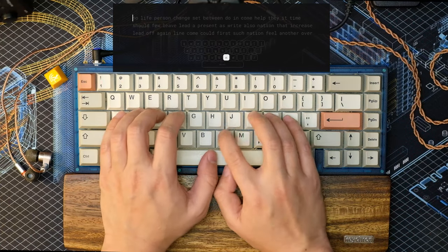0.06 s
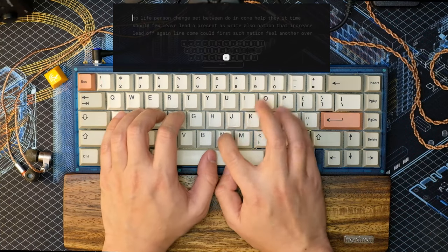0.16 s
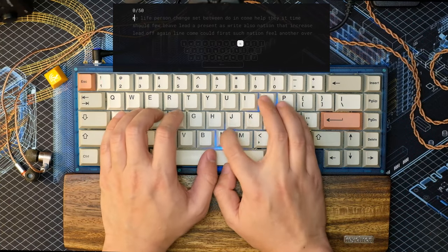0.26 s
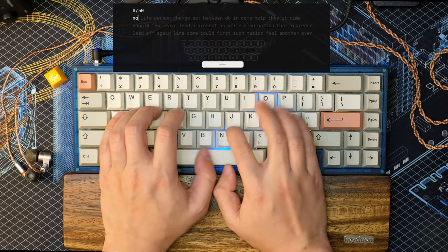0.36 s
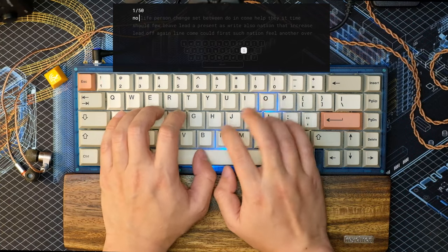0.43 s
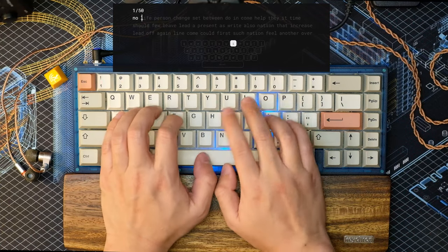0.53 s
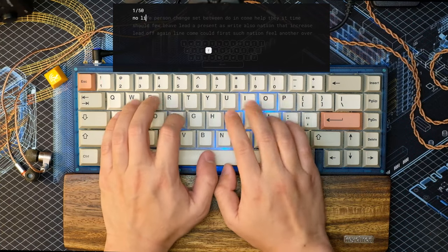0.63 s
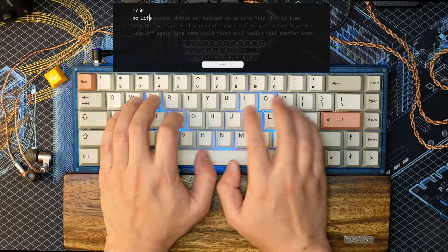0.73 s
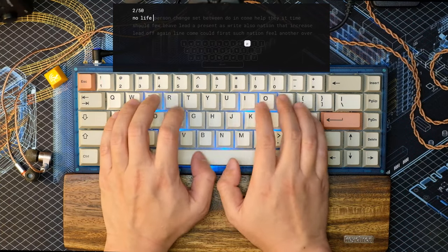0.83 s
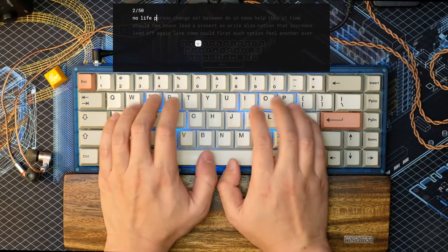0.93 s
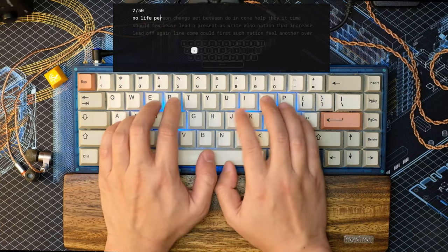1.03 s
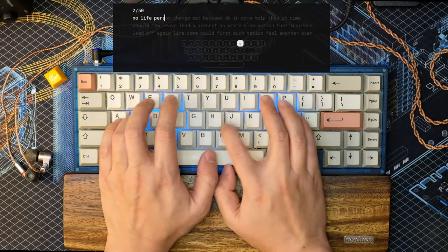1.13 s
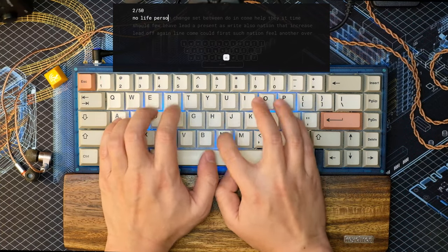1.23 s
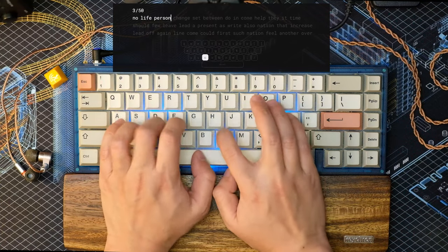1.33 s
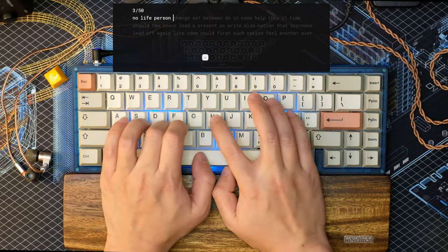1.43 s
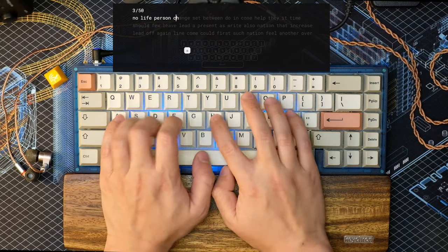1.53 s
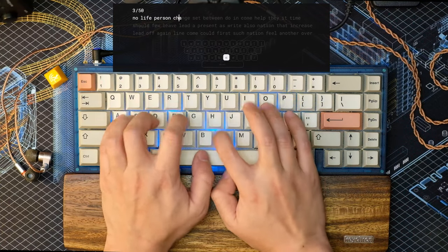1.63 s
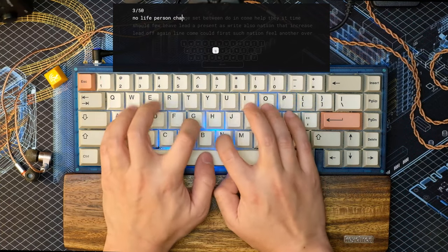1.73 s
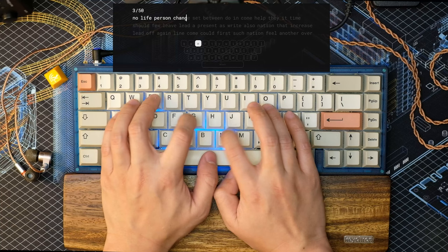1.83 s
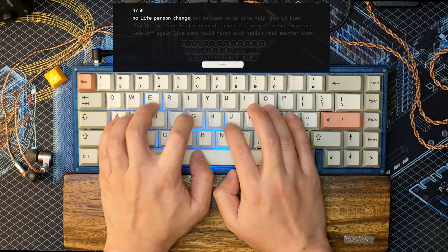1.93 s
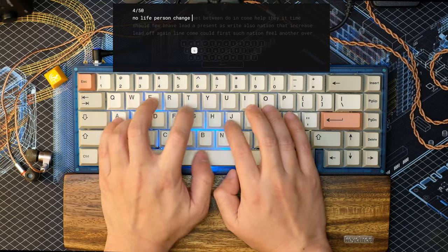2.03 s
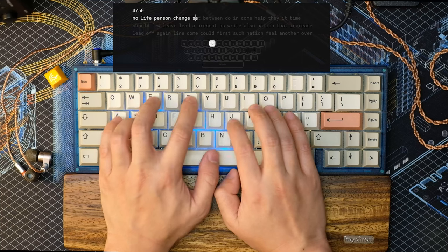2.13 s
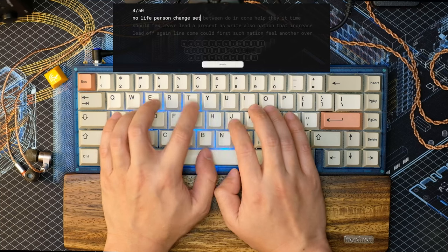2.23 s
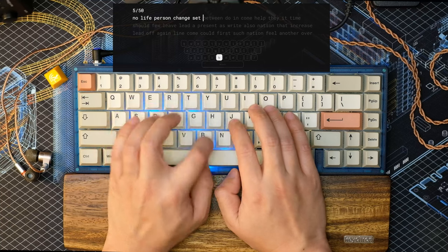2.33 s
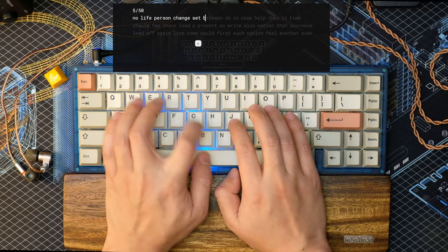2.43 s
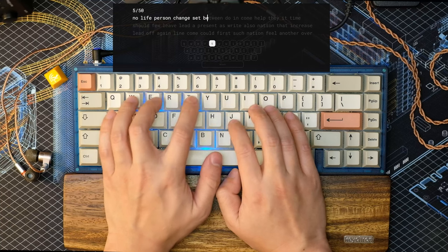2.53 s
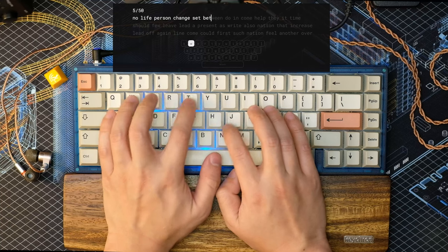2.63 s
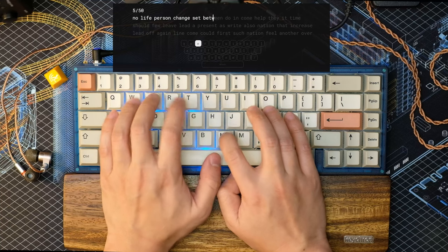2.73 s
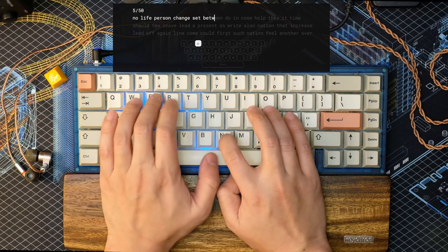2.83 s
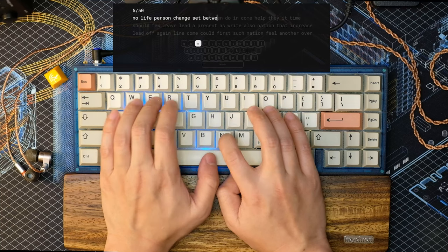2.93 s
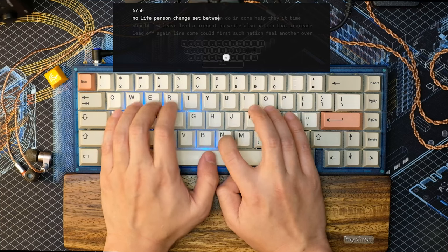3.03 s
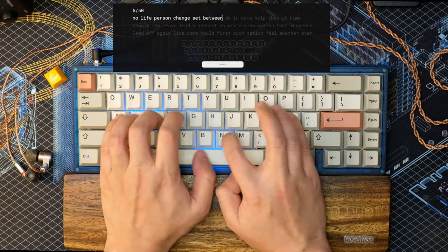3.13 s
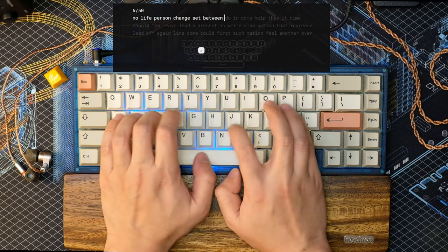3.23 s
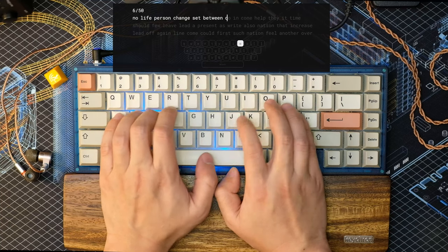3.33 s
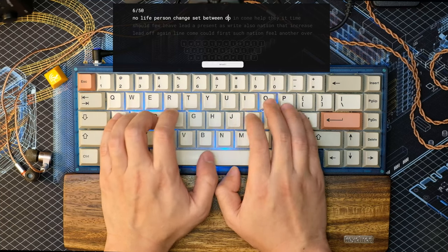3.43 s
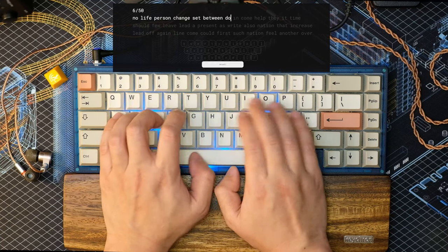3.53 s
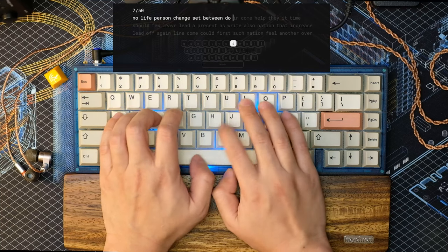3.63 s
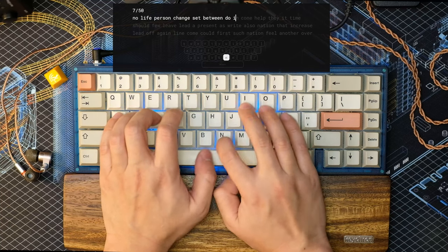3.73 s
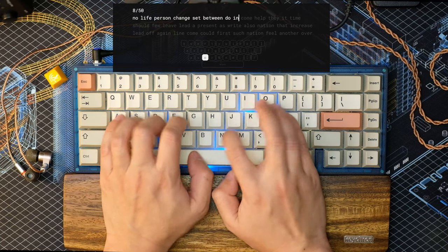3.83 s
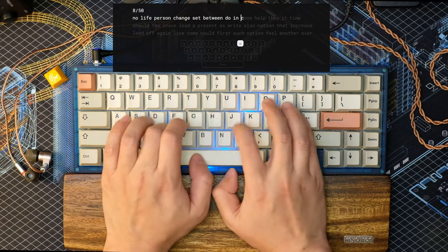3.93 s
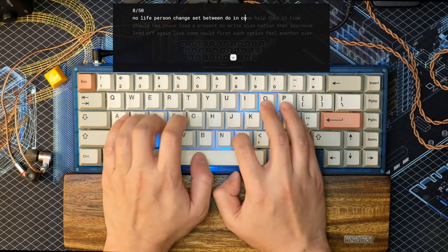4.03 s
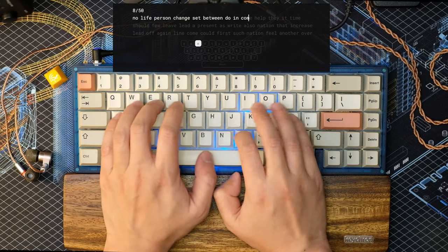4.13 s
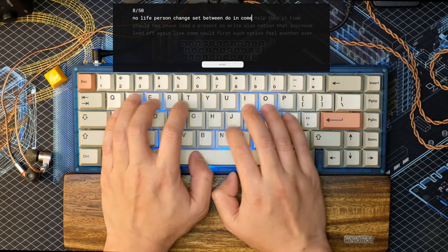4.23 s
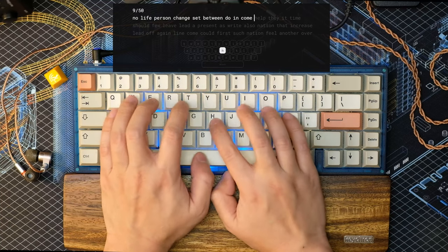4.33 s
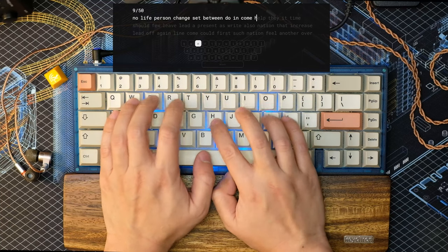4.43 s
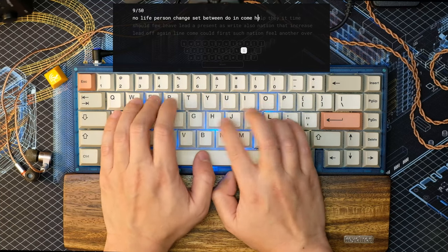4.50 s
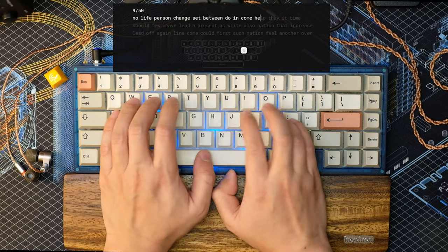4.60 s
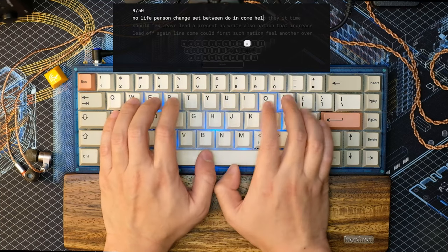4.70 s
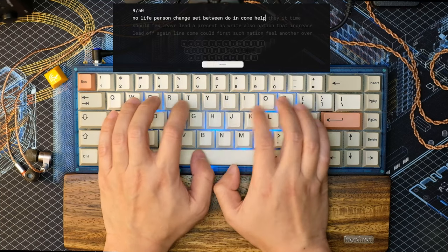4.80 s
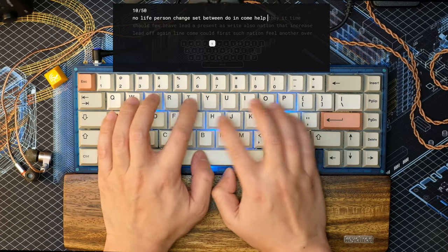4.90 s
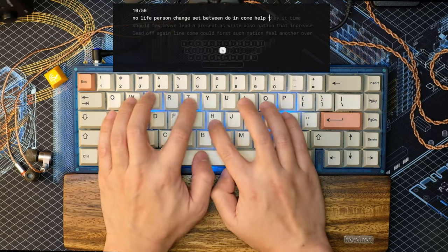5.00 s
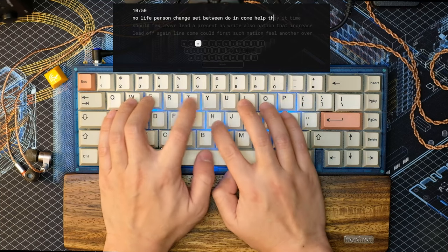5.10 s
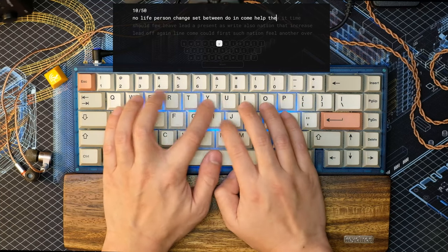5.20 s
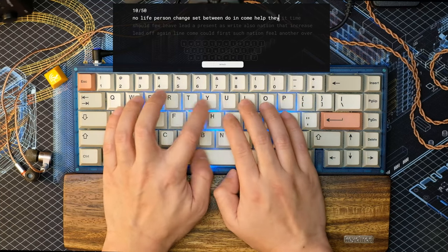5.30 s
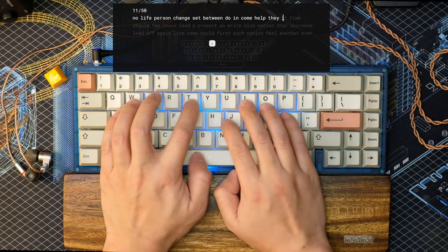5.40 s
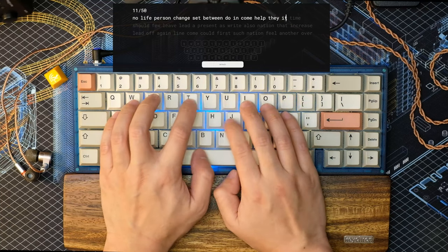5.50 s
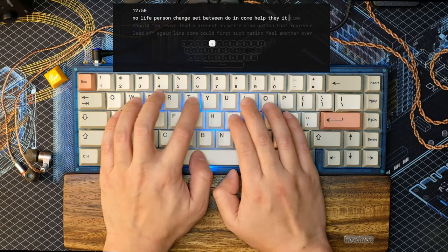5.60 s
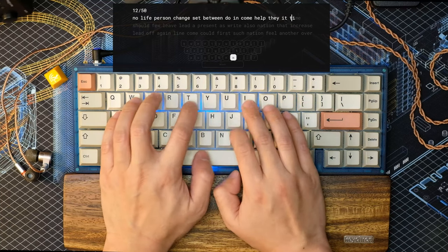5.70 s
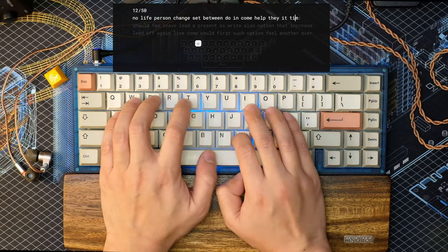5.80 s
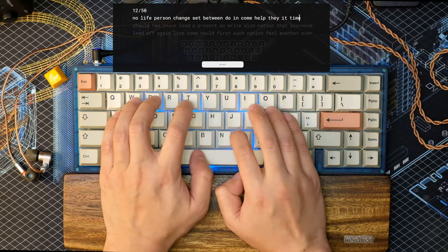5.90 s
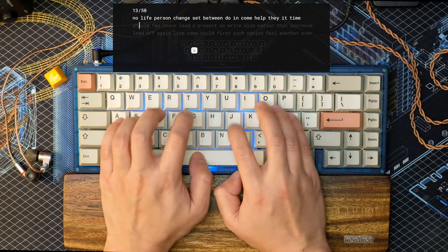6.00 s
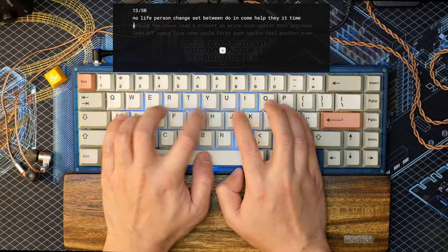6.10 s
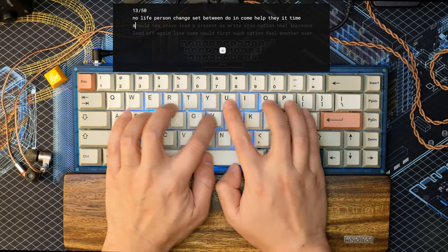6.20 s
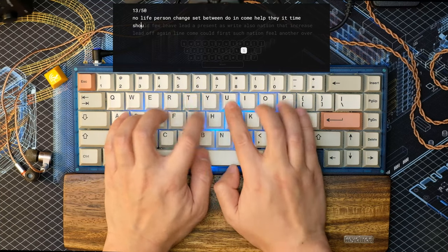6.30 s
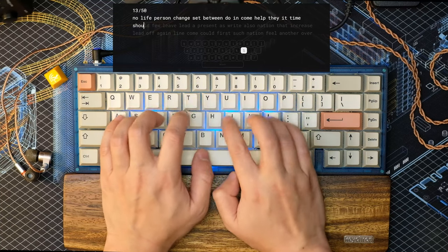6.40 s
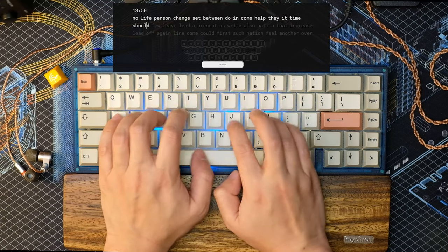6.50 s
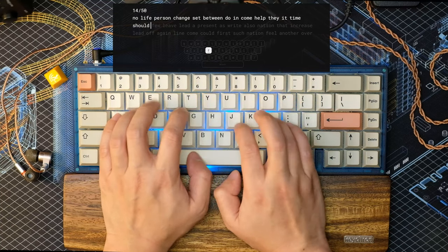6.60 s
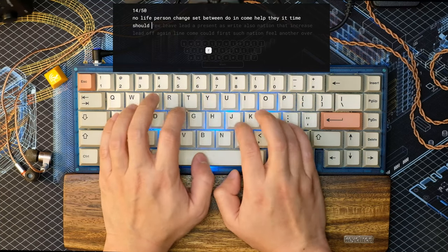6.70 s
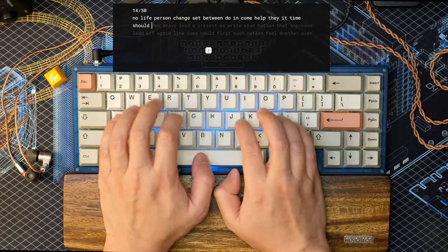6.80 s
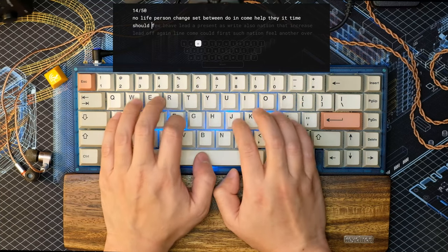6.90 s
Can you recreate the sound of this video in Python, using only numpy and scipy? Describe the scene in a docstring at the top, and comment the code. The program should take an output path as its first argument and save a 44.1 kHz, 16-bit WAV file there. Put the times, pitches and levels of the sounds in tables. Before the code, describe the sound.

After a brief moment of faint room air and low rumble, two hands begin typing quickly on a mechanical keyboard. Plastic caps clack, switches tick and keys spring back in an irregular dense patter, while the thumb's space-bar hits give lower, hollow thocks every half second or so. Close stereo microphone, small quiet room, short dry tail. The last second grows sparse.

```python
"""Low desk rumble and faint room air, then fast typing on a mechanical keyboard, close, in a quiet small room.
Each key bottoms out and springs back: cap clacks, plate knocks, case thocks, switch ticks.
The long space bar booms lower; fingers brush the caps. Parts are impulses and decaying noise in
minimum-phase colours; the case is a sum of decaying modes. A hard surface adds a quick echo, the room a tail."""
import sys
import numpy as np
from scipy import signal
from scipy.fft import rfft, irfft, next_fast_len
from scipy.io import wavfile
from scipy.ndimage import uniform_filter1d

SR = 44100
rng = np.random.default_rng(int(sys.argv[2]) if len(sys.argv) > 2 else 0)


def master(y):
    """Save y as 16-bit WAV."""
    cut = np.clip(np.atleast_2d(y).T, -1, 1)
    pcm = np.round(cut * 32767)  # scale
    wavfile.write(sys.argv[1], SR, pcm.astype(np.int16))


N = 306495

# background: desk rumble colour, room air colour (f/Hz, level/dB)
DESK_COLOUR = [(25, -15), (36, -16), (45, 4), (54, -11), (68, -11.5), (95, -23.5), (300, -25), (1500, -130)]
AIR_COLOUR = [(70, 2), (420, -6), (700, -12), (3000, -17), (5000, -26), (11000, -26), (16000, -33)]
# room decay (f/Hz, t60/s)
ROOM_T60 = [(200, 0.32), (2500, 0.31), (10000, 0.27), (13000, 0.21)]
# colour returned by a hard surface (f/Hz, level/dB)
MIRROR_COLOUR = [(400, -10), (1500, 1), (2600, 4), (5000, -7.5), (10000, 3.5), (13000, -10)]
# stereo lean: lowest case boom lies to the left (f/Hz, left minus right/dB)
LEAN = [(70, 4), (140, 12.5), (280, 1.5), (600, 0)]
# case modes before scatter, detuning and damping (f/Hz, level/dB, t60/s)
CASE_MODES = [(173.4, -11, 0.12), (257.6, -3.5, 0.022), (310, -7.5, 0.12), (407.6, 3.5, 0.053),
              (463, -17, 0.14), (592, -8.5, 0.052)]
# radiation of the small case: no deep bass (f/Hz, level/dB)
CASE_RADIATION = [(60, -24), (160, -5), (320, 0), (480, 0), (650, -4), (850, -19), (6000, -52)]
# part colours: plate, key cap, space bar, switch tick, first-touch snap, switch leaf (f/Hz, level/dB)
PLATE_COLOUR = [(300, -19), (680, -6), (880, 1.5), (1450, 1), (1850, -7), (3500, -9), (10000, -66)]
CAP_COLOUR = [(400, -64.5), (1300, -19.5), (2000, -7.5), (2500, -4), (4000, -10), (5500, -19), (7500, -24),
              (16000, -60)]
BAR_COLOUR = [(600, -37), (2000, -9), (3000, -6.5), (3500, -4.5), (3750, -10), (4000, -13), (4500, -18),
              (7000, -32), (16000, -37.5)]
TICK_COLOUR = [(3000, -81), (8400, -1.5), (9850, 6), (11300, -6.5), (13500, -14.5), (16000, -61)]
SNAP_COLOUR = [(1000, -33.5), (4100, 5.5), (6000, -6), (8000, -12), (16000, -18.5)]
LEAF_COLOUR = [(4000, -6), (12000, -2), (16000, -10)]
# fingertips landing on or brushing caps, no full stroke (t/s, level/dB)
TOUCHES = [(0.1723, -52), (0.2613, -48), (0.4783, -42), (0.6011, -33.5), (0.6873, -33.5), (1.6074, -40),
           (1.7553, -35), (2.027, -43), (2.376, -38), (3.5271, -28), (3.7222, -36.5), (4.632, -41),
           (4.7348, -42.5), (5.022, -47), (5.1477, -36), (5.6705, -33), (5.7396, -35), (5.9159, -30.5),
           (6.0613, -43), (6.3537, -37), (6.4164, -39.5)]
# thumb strikes on the space bar (t/s, strength/dB)
SPACE_DOWN = [(0.4056, -20), (0.781, -20), (1.318, -22.5), (1.935, -20.5), (2.2494, -22), (3.1695, -32),
              (3.5365, -24), (3.8144, -25.5), (4.249, -27.5), (4.8336, -27.5), (5.3213, -22.5),
              (5.5465, -23), (5.9228, -25.5), (6.5657, -27)]
# parts re strength (body/dB, plate/dB, bar/dB, tick/dB)
SPACE_DOWN_PARTS_DB = [1.4, -1, 0.6, -23.5]
# space bar springing back, about 0.1 s later (t/s, strength/dB)
SPACE_UP = [(0.5332, -22.5), (0.9028, -21.5), (1.4432, -38), (2.056, -26), (2.3464, -24), (3.2809, -25),
            (3.6995, -28.5), (3.9295, -29.5), (4.3594, -27.5), (4.9548, -36.5), (5.4252, -33.5),
            (5.6351, -42), (6.0293, -32), (6.6976, -30.5)]
# parts re strength (case/dB, plate/dB, cap/dB, tick/dB)
SPACE_UP_PARTS_DB = [-0.1, 1.25, .2, -15.5]
# letter keys bottoming out or springing back (t/s, strength/dB, hardness/dB, plate f/Hz, cap f/Hz)
KEYS = [(0.2021, -22, -2, 1060, 2370), (0.2794, -21, 2, 1470, 2190), (0.3444, -27, -14.5, 1360, 2320),
        (0.3949, -26.5, -2, 990, 2250), (0.501, -22.5, -2.5, 1460, 2260), (0.5599, -18, 5, 1290, 2050),
        (0.6371, -19, -2.5, 990, 2300), (0.6653, -30.5, -7, 1460, 2300), (0.7041, -24, 7, 1500, 2550),
        (0.8268, -28.5, 3, 1450, 2360), (0.8445, -23, -4, 1430, 2500), (0.9392, -27, 6.5, 1220, 2250),
        (0.961, -26, 1, 1480, 2250), (0.994, -22, -2, 1380, 4570), (1.0833, -25, 2, 1110, 2870),
        (1.122, -25, 1.5, 860, 2370), (1.1305, -33, -28, 1430, 2320), (1.2057, -26, -3.5, 925, 2850),
        (1.2322, -25, -13.5, 1450, 2300), (1.3592, -25, -7.5, 1090, 2270), (1.443, -27, 1, 1490, 2480),
        (1.531, -26, 7.5, 1210, 3780), (1.5405, -24.5, 1.5, 1500, 2930), (1.6291, -24, 7.5, 1020, 1860),
        (1.6386, -28, -19, 1210, 2290), (1.7273, -23, -4, 1440, 2440), (1.778, -30, 9, 1660, 1890),
        (1.781, -28.5, -20, 900, 2080), (1.8405, -21.5, 1, 970, 2580), (1.886, -28, -2, 1030, 2160),
        (2.0424, -23, 4.5, 980, 3060), (2.1104, -26, 6.5, 1250, 2270), (2.1763, -24.5, 4.5, 1290, 2260),
        (2.2889, -34.5, 5, 1290, 2520), (2.3985, -27.5, -3, 1410, 2510), (2.445, -20, 3.5, 1340, 2500),
        (2.5033, -29.5, 7, 1240, 2350), (2.5727, -19, 6, 940, 2070), (2.5993, -23.5, 2.5, 1400, 2430),
        (2.6636, -20.5, 3.5, 940, 2340), (2.697, -22, 1.5, 1270, 2340), (2.7808, -25, -1.5, 1160, 2100),
        (2.8616, -26, 4.5, 1310, 2300), (2.936, -31.5, 3.5, 1420, 2360), (2.9931, -30, 7, 1340, 2330),
        (3.0702, -23, -1, 1220, 2500), (3.1699, -27.5, -12, 950, 2470), (3.383, -30.5, 1, 1390, 2500),
        (3.4237, -24.5, -0.5, 1450, 3850), (3.6328, -25, 4, 1310, 4020), (3.7412, -24, -6, 1520, 2480),
        (3.848, -26, -7.5, 950, 2470), (3.9997, -23.5, 2, 1420, 3630), (4.0386, -29.5, 0.5, 1520, 3100),
        (4.0823, -28.5, -1, 970, 2280), (4.1651, -31, 9, 1450, 2340), (4.213, -29, -2, 880, 2600),
        (4.265, -27, 2.5, 1570, 2470), (4.3865, -29, 5.5, 1190, 3710), (4.4958, -23.5, 5.5, 1680, 2180),
        (4.5924, -28.5, -1, 1560, 2350), (4.67, -23.5, -1.5, 1500, 2250), (4.745, -26.5, 4, 1410, 4380),
        (4.8446, -33.5, -1, 1280, 2540), (4.9654, -25.5, 4, 940, 2170), (5.0387, -25, 2.5, 1180, 3860),
        (5.0598, -25.5, 3.5, 1310, 2050), (5.1265, -33.5, 3, 1450, 2180), (5.2038, -28.5, 2, 1210, 2120),
        (5.2454, -29.5, -1, 905, 2180), (5.3477, -27.5, -7, 880, 2170), (5.3692, -26.5, 1.5, 1340, 2100),
        (5.4569, -24.5, 5, 940, 2060), (5.6354, -24.5, 3.5, 925, 2100), (5.6941, -31, -1.5, 1270, 2200),
        (5.8043, -27.5, 2, 945, 2460), (5.8602, -29, 1, 1500, 2430), (5.9565, -31.5, -3, 1170, 2360),
        (6.0784, -32.5, 1, 1630, 2820), (6.1512, -27.5, 2.5, 855, 2830), (6.2033, -29.5, 3, 1220, 2420),
        (6.2468, -29, -1, 1440, 2400), (6.291, -28.5, 2.5, 1130, 2520), (6.388, -30, -4, 990, 2190),
        (6.4322, -31, -3, 1510, 2290), (6.482, -25, -1, 1420, 2680), (6.539, -37, -2, 1120, 2410),
        (6.5916, -29, -5.5, 850, 2700), (6.8715, -35, 9.5, 1050, 3580), (6.8963, -29, 3.5, 1040, 2340)]
# letter parts re strength (case/dB, plate/dB, cap/dB, tick/dB)
KEY_PARTS_DB = [-14, -3, 1.02, -10]
# hard contact feeds the tick, starves the low parts (case, plate, cap, tick; each dB per dB of hardness)
HARDNESS_SHIFT_DB_PER_DB = [-.4, -0.29, -0.23, 0.92]

TOP_HZ = 15900
SIZE = 4096  # samples per short sound
T_S = np.arange(SIZE) / SR
HZ = np.fft.rfftfreq(SIZE, 1 / SR)
RUMBLE_DB, AIR_DB = -54.5, -52.5  # rumble at rest
SWAY_DB, THUMB_DB, SWAY_T60_S = -24, 4, 2.18  # sway re blow strength, extra for the thumb
KEYS_ROOM_DB, SPACE_ROOM_DB = -15, -18
SLIDE_DB, SLIDE_LEAF_DB, GRAZE_DB = -51, -8, -48  # leaf level is relative to its slide or graze
SPACE_UP_PLATE_HZ, SPACE_UP_CAP_HZ = 847, 2700


def amp(db):
    """Decibels to gain."""
    return 10 ** (np.asarray(db) / 20)


def unit(x):
    """Scale to rms 1."""
    return x / np.sqrt(np.mean(x ** 2) + 1e-20)


def blow(x):
    """Scale a short sound to the energy of 10 ms at rms 1."""
    return x / np.sqrt(np.sum(x ** 2) / (SR / 100) + 1e-20)


def fade(t_s, t60_s):
    """Exponential decay, 60 dB per t60."""
    return np.exp(-np.log(1000) * t_s / t60_s)


def along(points, hz):
    """Interpolate (f/Hz, value) points on a log frequency axis."""
    f, v = np.transpose(points)
    return np.interp(np.log(hz + 1), np.log(f), v)


def add(track, t_s, sound):
    """Mix a sound into a track at time t_s."""
    part = track[..., max(0, round(t_s * SR)):][..., :sound.shape[-1]]
    part += sound[..., :part.shape[-1]]


def later(sound, delay_s):
    """Delay a short sound."""
    return np.pad(sound, (round(abs(delay_s) * SR), 0))[:SIZE]


def filtered(x, gain):
    """Apply a zero-phase gain that depends on frequency."""
    m = next_fast_len(N + SR // 2)
    spectrum = rfft(x, m) * gain(np.fft.rfftfreq(m, 1 / SR))
    return irfft(spectrum, m)[..., :N]


def causal(push, colour_db):
    """Minimum-phase colouring via the folded cepstrum: rings only after the push."""
    cepstrum = irfft(np.log(amp(colour_db)))
    cepstrum[1:SIZE // 2] *= 2
    cepstrum[SIZE // 2 + 1:] = 0
    return blow(irfft(rfft(push) * np.exp(rfft(cepstrum))))


def noise(colour, side_db):
    """Coloured stereo noise of rms 1, from mid and side."""
    mid, side = filtered(rng.standard_normal((2, N)), lambda hz: amp(along(colour, hz)))
    side = amp(side_db) * side
    return unit(np.array([mid + side, mid - side]))


def sway():
    """Rumble gain: each blow pushes the desk, the thumb hardest; powers pile up and decay."""
    t_s = np.arange(0, N, 100) / SR
    blows = [row[:2] for row in KEYS] + [(s, db + THUMB_DB) for s, db in SPACE_DOWN]
    power = 0
    for s, db in blows:
        power = power + amp(db + SWAY_DB) ** 2 * (t_s > s) * fade(np.abs(t_s - s), SWAY_T60_S) ** 2
    smooth_power = np.abs(uniform_filter1d(power, size=40))
    gain = np.sqrt(amp(RUMBLE_DB) ** 2 + smooth_power)
    return np.interp(np.arange(N) / SR, t_s, gain)


def background():
    """Desk swaying at its low resonance as the hands work, plus steady faint room air."""
    rumble = noise(DESK_COLOUR, side_db=-9)
    return sway() * rumble + amp(AIR_DB) * noise(AIR_COLOUR, side_db=-6.5)


def room(x, t60_points, onset_s):
    """Diffuse tail of decaying noise, unlike at each ear, redrawn for each of 24 time slices."""
    out = np.zeros((2, N))
    for part in np.array_split(np.arange(N), 24):
        hz, t_s, z = signal.stft(rng.standard_normal((2, SR // 3)), SR, nperseg=256)
        shape = fade(t_s, along(t60_points, hz)[:, None]) * (1 - np.exp(-t_s / onset_s))
        tail = signal.istft(z * shape, SR, nperseg=256)[1]
        tail = tail / np.linalg.norm(tail[0])
        add(out, part[0] / SR, signal.fftconvolve(x[:, part], tail, axes=1))
    return out


def echoes(x):
    """A hard surface returns a bright echo; a duller one follows, then a faint one from farther off."""
    bright = filtered(x, lambda hz: amp(along(MIRROR_COLOUR, hz)))
    out = np.zeros((2, N))
    add(out, .0165, amp(-17.5) * bright)
    add(out, .0181, amp(-22) * x)
    add(out, .0266, amp(-28) * bright)
    return out


def placed(sound, spread_db):
    """Random left-right pan; hands and desk scatter the sound unlike to the two sides."""
    paths = later(rng.standard_normal(SIZE) * fade(T_S, 0.0024), .0005)
    side = amp(-15.5) * signal.fftconvolve(sound, paths / np.linalg.norm(paths))[:SIZE]
    pan = amp(rng.uniform(-1.14, 1) * spread_db)
    return np.array([sound * pan + side, sound / pan - side])


def resonance(hz, width_hz, height_db):
    """Resonant peak in dB: the note a part favours."""
    return 10 * np.log10(1 + amp(height_db) ** 2 / (1 + ((HZ - hz) / width_hz * 2) ** 2))


def struck(colour_db, t60_s, rattle_db):
    """Impulse plus decaying noise (a crowd of dense modes), in the colour of a part."""
    impulse = blow(np.eye(1, SIZE)[0])
    rattle = amp(rattle_db) * blow(rng.standard_normal(SIZE) * fade(T_S, t60_s))
    return causal(impulse + rattle, colour_db)


def tick():
    """Thin, high switch ring; its note varies at random."""
    note = resonance(9850 * (1 + .03 * rng.standard_normal()), width_hz=500, height_db=5)
    return struck(along(TICK_COLOUR, HZ) + note, t60_s=.007, rattle_db=7)


def thock(scatter_db, detune, damping):
    """Decaying case modes, scattered per blow; so small a box radiates no deep bass."""
    modes = np.zeros(SIZE)
    for hz, db, t60_s in CASE_MODES:
        level_chance, pitch_chance = rng.standard_normal(2)
        ring = np.cos(2 * np.pi * hz * (1 + detune * pitch_chance) * T_S)
        modes += amp(db + scatter_db * level_chance) * fade(T_S * damping, t60_s) * ring
    return causal(modes, along(CASE_RADIATION, HZ))


def brush():
    """Loose cap nudged by a fingertip: cap and plate colours, plus a tick."""
    colour_db = np.maximum(along(CAP_COLOUR, HZ), along(PLATE_COLOUR, HZ))
    return struck(colour_db, t60_s=.015, rattle_db=6) + amp(-8) * tick()


def contact(parts_db, plate_hz, cap_hz):
    """A key rings its own patch of plate and its own cap, over the shared case."""
    case_db, plate_db, cap_db, tick_db = parts_db
    chatter_db = rng.uniform(-2, 4)  # some caps land squarely, others wobble
    case = amp(case_db - 2) * thock(scatter_db=3, detune=.04, damping=1.2)
    plate_note = resonance(plate_hz, width_hz=240, height_db=8)
    plate = amp(plate_db - 2) * struck(along(PLATE_COLOUR, HZ) + plate_note, t60_s=0.028, rattle_db=7.5)
    cap_note = resonance(cap_hz, width_hz=.22 * cap_hz, height_db=8)
    cap = struck(along(CAP_COLOUR, HZ) + cap_note, t60_s=0.012, rattle_db=2.5 + chatter_db)
    cap = amp(cap_db - 3) * cap
    # bare first touch of hard plastic, strong when cap and switch are both loud
    snap = struck(along(SNAP_COLOUR, HZ), t60_s=0.0041, rattle_db=-4.5 + chatter_db)
    snap = amp((cap_db + tick_db) / 2 - 5) * snap
    switch = amp(tick_db - 3) * later(tick(), .0003)
    # cap and snap have inverted polarity
    return placed(case + later(plate, 0.00019) - cap - snap + switch, spread_db=1.93)


def fingers():
    """A stem slides just before each contact; fingertips graze loose caps, some quite clearly."""
    out = np.zeros((2, N))
    for s, *_ in KEYS:
        slide = struck(along(CAP_COLOUR, HZ), t60_s=.018, rattle_db=12) + amp(-5) * tick()
        leaf = amp(SLIDE_LEAF_DB) * struck(along(LEAF_COLOUR, HZ), t60_s=0.016, rattle_db=7)
        add(out, s - rng.uniform(0.0041, .007), amp(SLIDE_DB) * (slide + leaf))
        graze_db = GRAZE_DB + rng.uniform(-6, 6)
        graze = amp(graze_db) * (brush() + leaf)
        add(out, s + rng.uniform(-.03, .055), placed(graze, spread_db=1))
    for s, level_db in TOUCHES:
        add(out, s, placed(amp(level_db) * brush(), spread_db=-2.5))
    return out


def space_bar():
    """The thumb drives the long bar into mid-case: case booms, plate knocks; then it springs back."""
    out = np.zeros((2, N))
    for s, strength_db in SPACE_DOWN:
        body_db, plate_db, bar_db, tick_db = strength_db + np.array(SPACE_DOWN_PARTS_DB)
        body = amp(body_db + .7) * thock(scatter_db=1, detune=.008, damping=1)
        plate_note = resonance(1280, width_hz=300, height_db=10)
        knock = amp(plate_db - 6) * struck(along(PLATE_COLOUR, HZ) + plate_note, t60_s=0.032, rattle_db=21)
        bar_note = resonance(3420, width_hz=300, height_db=7)
        bar = amp(bar_db) * struck(along(BAR_COLOUR, HZ) + bar_note, t60_s=0.016, rattle_db=5.5)
        switch = amp(tick_db) * tick()
        add(out, s, placed(body + knock + bar + switch, spread_db=1))
    for s, strength_db in SPACE_UP:
        parts_db = strength_db + np.array(SPACE_UP_PARTS_DB)
        add(out, s, contact(parts_db, SPACE_UP_PLATE_HZ, SPACE_UP_CAP_HZ))
    return out


def letters():
    """Strength raises all parts of a key together; hardness tips it from knock to tick."""
    out = np.zeros((2, N))
    for s, strength_db, hardness_db, plate_hz, cap_hz in KEYS:
        shift_db = hardness_db * np.array(HARDNESS_SHIFT_DB_PER_DB)
        parts_db = strength_db + np.array(KEY_PARTS_DB) + shift_db
        add(out, s, contact(parts_db, plate_hz, cap_hz))
    return out


def scene():
    """Keyboard with its echoes and room tail, over the background."""
    small, bar = letters() + fingers(), space_bar()
    half_lean = np.array([[.5], [-.5]])  # left, right
    keys = filtered(small + bar, lambda hz: amp(half_lean * along(LEAN, hz)))
    room_feed = amp(KEYS_ROOM_DB) * small + amp(SPACE_ROOM_DB) * bar
    return keys + echoes(keys) + room(room_feed, ROOM_T60, onset_s=0.0012) + background()


def record(dry):
    """Round off the sharpest peaks below 0.75, then cut all above the band limit."""
    rounded = dry / (1 + np.abs(dry / .75) ** 4) ** (1 / 4)
    return filtered(rounded, lambda hz: hz < TOP_HZ)


dry = scene()
out = record(dry)
master(out)
```